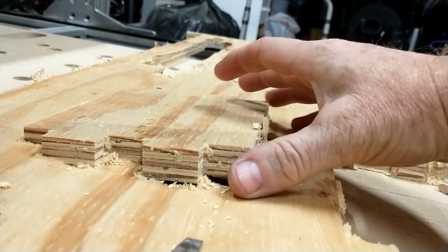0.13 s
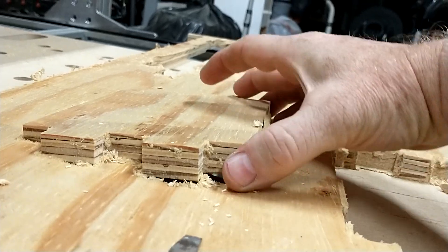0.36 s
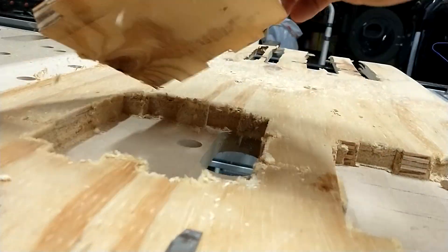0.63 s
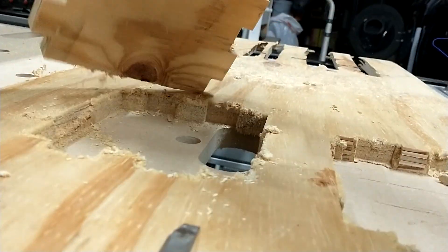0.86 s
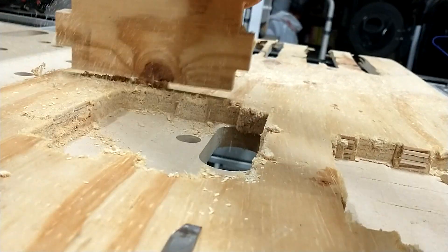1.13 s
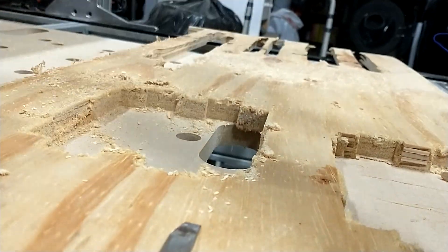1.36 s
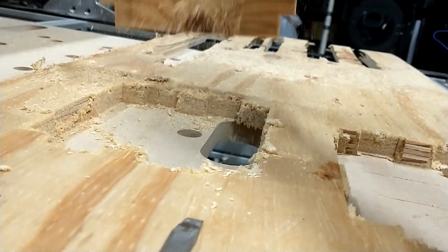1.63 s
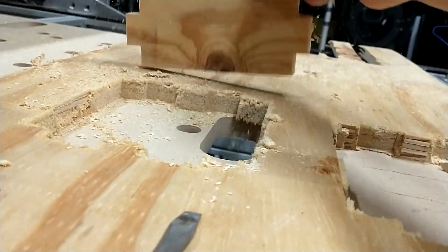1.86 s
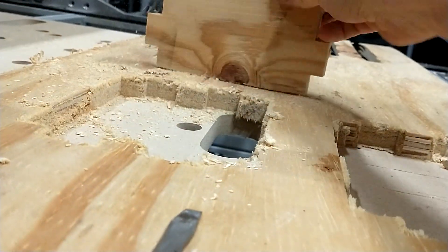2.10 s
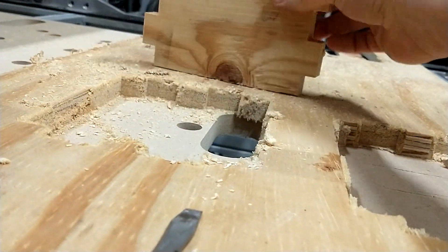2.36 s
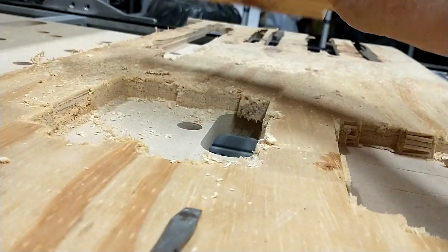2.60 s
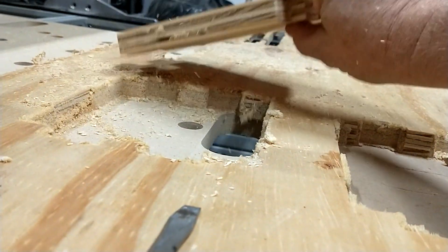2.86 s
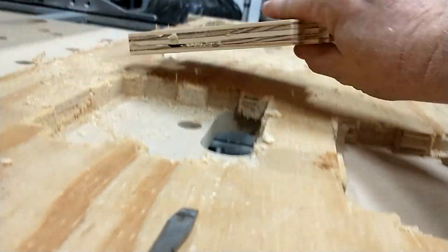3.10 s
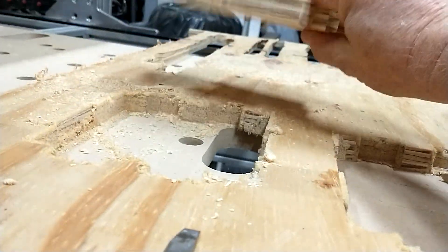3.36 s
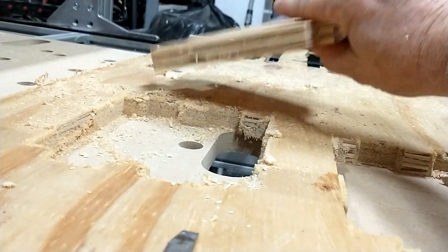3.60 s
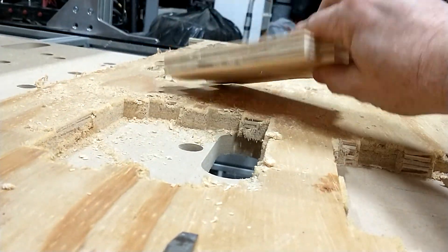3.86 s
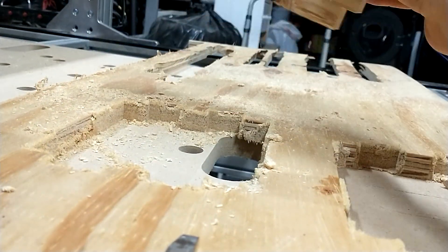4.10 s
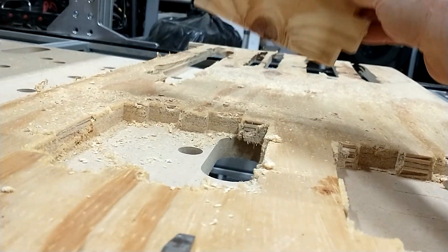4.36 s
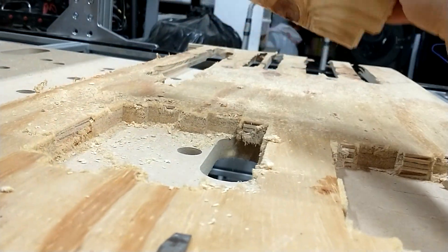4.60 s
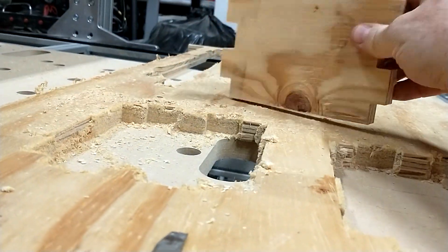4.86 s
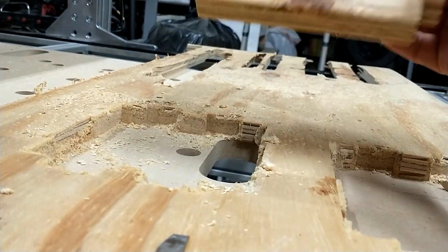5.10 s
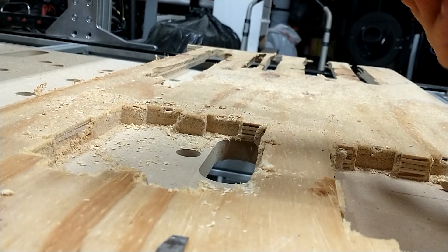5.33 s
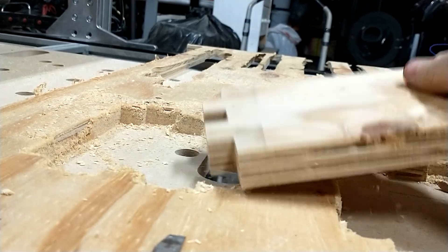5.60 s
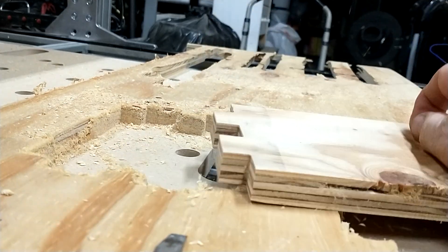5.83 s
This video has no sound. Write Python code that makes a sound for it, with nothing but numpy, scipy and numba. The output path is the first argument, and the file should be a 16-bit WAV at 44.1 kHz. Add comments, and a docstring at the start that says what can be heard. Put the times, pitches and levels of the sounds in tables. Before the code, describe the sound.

A close phone microphone hears a small plywood piece handled and knocked on a plywood sheet over a workshop bench. At 0 s come tiny woody taps, then near quiet with faint room air and a low machine hum. A short skin and sawdust rustle flicks at 0.5 s and again around 0.8-1.1 s, with a soft knock at 1.0. Firm, sharp edge knocks land at 1.6, 1.9 and 2.2 s, some doubled by a bounce. After a light tick at 2.6, a run of flatter, duller-edged claps comes about every quarter second from 2.85 to 3.85, growing stronger. The hardest bangs, with deep bench thump and chatter, hit at 4.3, 4.5 and 4.8 s, plus a rebound at 4.9. Faint rustles fill the pause; two bright clacks end it at 5.6 and 5.9, the last rattling. Each knock leaves a brief room echo, and peaks sound compressed.

```python
"""Plywood knocked on a workshop bench

A hand knocks a small plywood piece on its edge against a plywood sheet on a bench, close to a phone.
Each blow pushes the sheet, chatters, and rings the modes of wood and bench; decaying noise and slow
standing waves make the workshop echo, and a weaker, thinner return comes from the far wall.
Fingers and sawdust rustle as grains of noise over room air and a faint machine hum made of wavering
sines. The phone's gain control and limiter hold down the hardest blows."""
import sys
import numpy as np
from scipy import signal
from scipy.fft import rfft, irfft
from scipy.io import wavfile
from scipy.ndimage import uniform_filter1d, minimum_filter1d
from numba import njit

SR = 44100
rng = np.random.default_rng(int(sys.argv[2]) if len(sys.argv) > 2 else 0)


def rack_gain(trim_db):
    """Turn a fader trim in dB into the linear factor to multiply a signal by."""
    fader = np.asarray(trim_db, float)
    return 10 ** (fader / 20)


def unload_audio(sound):
    """Save the sound as a 16-bit wav file, at the path given as the first command line argument."""
    columns = np.transpose(np.atleast_2d(sound))
    # keep every value between -1 and 1, then stretch to whole-number steps
    steps = np.round(np.clip(columns, -1, 1) * 32767)
    wavfile.write(sys.argv[1], SR, steps.astype(np.int16))


N = 263227  # samples
LEAD_S = 0.012  # room before each contact

# Knocks of the piece on the sheet, from soft to hard, close to the phone. Each row: time in seconds,
# force in dB, body around 700 Hz in dB, edge over 6 kHz in dB, echo in dB; all dB are relative.
BLOWS = [(1.025, -22.5, 2, -4.5, -8.5), (1.5827, -8.5, -2.5, -4.5, -5.5), (1.8853, -0.5, -14.5, -11, -0.5),
         (2.1999, -0.5, -13, -10.5, -2), (2.8497, -8, -4.5, -19.5, -10.5), (3.108, -4.5, -15, -11.5, -1),
         (3.3426, -0.5, -14.5, -18.5, -7), (3.5917, -2, -11, -19.5, -4.5), (3.8419, 6, -16, -17.5, -3),
         (4.321, 7, -16, -12, -0.5), (4.5324, 9.5, -19.5, -12, 1), (4.7725, 12, -14, -9, 2),
         (5.5908, 2, -11.5, -3.5, -1), (5.901, -3, -8, -10, -3)]
# Same spot: lighter contacts after the blows, mostly the far corner landing late or the piece bouncing; # a few
# are soft knocks about 0.1 s after a blow. Each row: time in seconds, force in dB, # body in dB, edge in dB.
REBOUNDS = [(1.0330, -22.5, -4.5, -46), (1.5937, -8, -6.5, -8.5), (1.8923, -3, -17, -10.5),
            (1.9393, -14.5, -4.5, -34.5), (2.2064, -5, -9.5, -10.5), (2.8579, -8.5, -2.5, -23),
            (3.131, -24.5, -8, -12), (3.3608, -16.5, -1, -24), (3.3890, -31.5, 4.5, -30.5),
            (3.6180, -7, -13, -26.5), (3.847, 0.5, -16.5, -30), (3.8696, -22, -12.5, -29.5),
            (3.8877, -7.5, -3, -26), (3.9505, -13, -21.5, -33), (4.3462, -9.5, -7.5, -8),
            (4.5858, -15.5, -2, -25.5), (4.8234, -17.5, -7.5, -26), (4.875, -2, -14, -14.5),
            (5.9098, -7, -14, -7.5), (5.9165, -10.5, -8.5, -14), (5.9282, -8, -8, -12)]
# Same spot: light taps while the piece is lifted and shifted, or one end touches just before a blow.
# Each row: time in seconds, force in dB, thud under 300 Hz in dB, body in dB, edge in dB.
TAPS = [(0.001, -38, 0, 8, -5), (0.0126, -36.5, -4.5, 3.5, -50), (0.0348, -47, 3, 8.5, -46),
        (0.0508, -49.5, -9, 12.5, -55), (0.062, -52, -13, 6, -42), (0.2096, -66, 6, 8, -40),
        (0.2208, -67, 5, 13, -37), (0.9033, -50.5, 6, -16, 8), (2.5825, -36.5, -15.5, -30, -6),
        (2.5938, -62.5, 14, 7.5, -14.5), (4.3153, -22, -20.5, -12.5, -8.5),
        (4.5273, -12.5, -8.5, -17.5, -6), (4.7657, -8, -9.5, -15.5, -8.5), (5.5842, -20, -3.5, -15, -22)]


def contacts():
    """Every contact as (s, force, thud, body, edge, echo dB); a duller contact brings more thud."""
    rebound_echo_db, tap_echo_db = -8.5, -6.5

    def thud(body_db):
        return body_db - 9.5

    rows = [(*tap, tap_echo_db) for tap in TAPS]
    rows += [(s, force, thud(body), body, edge, rebound_echo_db) for s, force, body, edge in REBOUNDS]
    rows += [(s, force, thud(body), body, edge, echo) for s, force, body, edge, echo in BLOWS]
    return rows


# Modes of piece, sheet and bench, heard from close by. Each row: centre frequency in Hz, relative level
# in dB with the corner down, with the face down, with the long edge down, decay t60 in seconds.
WOOD_MODES = [(57.7, 16, 8, -2, 0.65), (99.5, 2, 5, 5, 0.8), (116, 8.5, 7, 9.5, 0.15),
              (160, -10, 2, -9.5, 0.031), (220.1, 3.5, 5, -1.5, 0.35), (274, 3, 0, 0, 0.11),
              (418.8, 4.5, 6.5, -12.5, 0.065), (623, 0, -37, -4.5, 0.083), (776, 5.5, 3, 3, 0.012),
              (1180, -8.5, -3.5, -9.5, 0.011), (1374, -14.5, 8, -22.5, 0.055),
              (1660, 3, -1.5, -20.5, 0.024), (2123, -1, -1.5, -7, 0.0082), (2602, 3.5, -3, -3.5, 0.027),
              (3700, -2, 5, -10, 0.009), (4104, 1.5, -10.5, 4, 0.017), (5530, -3, -0.5, 1, 0.0084),
              (5600, -11, -2, -9, 0.0037), (6990, 0, 1.5, -0.5, 0.0022)]
# Bench shake at the lowest bass under the phone. Each entry: relative dB for corner, face, long edge.
SHAKE_DB = [3.5, 9.5, 20.5]


def blow(grip, force_db, thud_db, body_db, edge_db, size=32768):
    """One contact: a short push and a rough chatter ring the wood; gives left, right and the walls' share."""
    from_contact = np.arange(size) / SR - LEAD_S
    t = np.clip(from_contact, 0, None)
    f = np.fft.rfftfreq(size, 1 / SR)

    # a faint burst of noise swells and fades around the moment of contact
    burst = uniform_filter1d(pair(size), 6) * np.exp(-np.abs(from_contact) / 0.0023) * rack_gain(-7.0)

    # a light touch is a longer, cleaner push
    push_s = 0.00045 * rack_gain(-0.12 * force_db)
    push = -np.sin(np.pi * np.clip(t / push_s, 0, 1)) ** 2 * rack_gain(6.5 - 0.12 * force_db)

    # the uneven edge chatters for a few milliseconds, longer after a hard blow
    chatter_s = 0.0075 * rack_gain(0.07 * force_db)
    chatter = pair(size) * (1 - np.exp(-t / 0.00076)) * np.exp(-(t / chatter_s) ** 2.8) * rack_gain(7.0)

    # each mode's pitch and share vary at random from contact to contact
    hz, *mode_db, t60 = np.array(WOOD_MODES).T[:, :, None]
    chance = rng.standard_normal((3, len(WOOD_MODES), 1))
    hz = hz * (1 + 0.019 * chance[0] * np.clip(hz / 1200, 1, 3))
    rate = np.log(1000) / t60
    ring = rate / (rate + 2j * np.pi * (f - hz)) * rack_gain(mode_db[grip] + 4.5 * chance[1])
    # phase turns, wider in the treble, set the right channel apart
    turn = np.exp(1j * np.clip(hz / 900, 0.8, 3) * chance[2])
    wood = np.array([ring.sum(axis=0), (ring * turn).sum(axis=0)]) + rack_gain(-7.5)

    # hard blows also shake the bench more
    tilt_hz = [30, 150, 500, 1300, 2500, 4500, 8500, 16000]
    tilt_db = [thud_db + SHAKE_DB[grip] + 0.4 * force_db, thud_db + 22.0, body_db + 8.5, body_db / 2 + 8,
               0, min(edge_db + 22, 0) * 0.3, edge_db - 1, edge_db - 19.5]
    tilt = causal(np.interp(np.log(f + 1), np.log(tilt_hz), tilt_db))
    thin_chatter = rfft(chatter) * f / (f + 200)  # little bass
    near = irfft((rfft(burst + push) + thin_chatter) * wood * tilt, size)

    # the walls hear the piece from all sides: broader modes, without the fine colour of the chatter
    broad = rate * np.clip(hz / 60, 1, 1.9)
    blurred = 0.76 * broad / (broad + 2j * np.pi * (f - hz)) * rack_gain(mode_db[grip] + 2.5 * chance[1])
    blurred = blurred.sum(axis=0) + rack_gain(-4.5)
    walls = irfft(blurred * tilt * np.exp(-2j * np.pi * f * LEAD_S), size) * rack_gain(21)

    fade = np.cos(np.linspace(0, np.pi / 2, size))
    return np.vstack([near, walls]) * fade * rack_gain(-4.5)


# The hand turns the piece from corner to face to long edge and back to the corner.
# Each entry: time of a turn in seconds.
REGRIP_S = [2.7, 4.1, 5.8]
# Return from the far wall to the phone. Each entry: relative dB for corner, face, long edge.
FAR_WALL_DB = [-28.5, -31, -22.5]


def knocks():
    """All contacts at their moments, and once more, weaker, thinner and wetter, from the far wall."""
    far_wall_s, far_wall_echo_db = 0.099, 15.5  # the return mostly swells the echo
    pan_db = -1.3  # left minus right
    lead, late = int(LEAD_S * SR), int(far_wall_s * SR)
    direct, back = np.zeros((2, 3, N + lead + late + 32768))
    for s, force_db, thud_db, body_db, edge_db, echo_db in contacts():
        grip = np.searchsorted(REGRIP_S, s) % len(SHAKE_DB)
        one = blow(grip, force_db, thud_db, body_db, edge_db)
        one = one * rack_gain(force_db + np.array([[pan_db / 2], [-pan_db / 2], [echo_db]]))
        returned = one * rack_gain(FAR_WALL_DB[grip] + np.array([[0], [0], [far_wall_echo_db]]))
        i = int(s * SR)
        direct[:, i:i + one.shape[1]] += one
        back[:, i + late:i + late + one.shape[1]] += returned
    # the return carries little bass
    back = signal.sosfilt(signal.butter(2, 250, "high", fs=SR, output="sos"), back)
    return (direct + back)[:, lead:lead + N]


# Strokes of fingers and sawdust on the wood, close to the phone. Each row: start in seconds,
# length in seconds, relative level at the end in dB, swell over the stroke in dB.
STROKES = [(0.517, 0.077, -53, 14), (0.794, 0.014, -61, -2), (0.832, 0.0043, -53.5, 24),
           (0.89, 0.2, -44.5, 19), (1.228, 0.034, -63.5, -1), (2.74, 0.051, -60, 7),
           (4.195, 0.11, -66, 3.5), (5.296, 0.042, -60, 1), (5.428, 0.125, -55.5, 8.5)]
# Colour of the rustle at the microphones. Each row: frequency in Hz, relative density in dB per Hz.
RUSTLE_COLOUR = [(710, -57.5), (1200, -8.5), (1770, -16), (2130, 3), (2320, -4), (2920, -14.5),
                 (4040, -2.5), (4910, -16), (5590, -8), (9510, -9), (16000, -30)]


def rustle():
    """Rubbing skin and trickling sawdust: dense noise grains of random strength, gated by strokes."""
    set_in_db_s, fade_db_s = 2503.5, 597.5
    flick_db = 5  # extra fade within one stroke length: short flicks stop sooner
    t = np.arange(N) / SR
    strength = rack_gain(1.8 * rng.exponential(size=N // 40 + 1)).repeat(40)[:N]
    grains = pair(N) * strength
    gain = 0
    for start, length, db, swell_db in STROKES:
        length = max(length, 0.002)
        since = t - start
        swell = swell_db * np.clip(1 - since / length, 0, 1)
        set_in = set_in_db_s * np.clip(since, None, 0)
        fade = (fade_db_s + flick_db / length) * np.clip(since - length, 0, None)
        gain = gain + rack_gain(db - swell + set_in - fade)
    return level(colour(grains, RUSTLE_COLOUR), 0.67) * gain


# Diffuse workshop echo around the phone. Each row: band centre in Hz, relative level in dB,
# decay t60 in seconds.
ROOM = [(93, -21.5, 0.81), (184.1, -8.5, 0.44), (361.5, -8.5, 0.36), (733, -15, 0.35), (1380, -16, 0.36),
        (2350, -16.5, 0.45), (3540, -18, 0.32), (6220, -20.5, 0.4), (11000, -17.5, 0.29),
        (14700, -38.5, 0.73)]
# Slow standing waves of the workshop. Each row: frequency in Hz, relative level in dB,
# decay t60 in seconds, build-up in seconds.
STANDING = [(58.95, -27, 0.53, 0.2), (96.03, -33, 0.65, 0.27)]


def workshop(x, gap_s=0.0098):
    """Diffuse echo: noise in each band dying at its own rate after a short gap, and standing waves."""
    t = np.arange(SR) / SR
    echo = 0
    for hz, db, t60 in ROOM:
        band_filter = signal.butter(3, [hz / 1.322, hz * 1.4], "band", fs=SR, output="sos")
        echo = echo + signal.sosfilt(band_filter, pair(SR)) * rack_gain(db - 60 * t / t60)
    echo = echo * (1 - np.exp(-(t / gap_s) ** 2))
    for hz, db, t60, build_s in STANDING:
        build_up = 1 - np.exp(-(t / build_s) ** 2)
        echo = echo + np.sin(2 * np.pi * hz * t) * rack_gain(db - 60 * t / t60) * build_up
    return signal.fftconvolve(echo, x[None], axes=1)[:, :N]


# Room air at the microphones. Each row: frequency in Hz, relative density in dB per Hz.
AIR = [(15, -54.5), (40, -45), (70, -27), (120, 1.5), (170, -5.5), (220, -4), (300, -10), (500, -13),
       (900, -16), (1200, -23), (2300, -23.5), (3000, -29), (8000, -33.5), (16000, -50)]
# Faint machine tones in the workshop. Each row: frequency in Hz, rms level in dB, wavering width in Hz.
HUM = [(119.3, -59.5, 2.1), (235, -70, 4.3), (2470, -80.5, 60)]


def background():
    """Room air as coloured noise, with machine tones whose pitch wavers at random."""
    out = level(colour(pair(N), AIR), -59)
    t = np.arange(N) / SR
    for hz, db, width_hz in HUM:
        drift = uniform_filter1d(rng.standard_normal(N), int(SR / 30))
        wander = np.cumsum(level(drift, 0) * width_hz) / SR  # cycles
        out = out + level(np.sin(2 * np.pi * (hz * t + wander)), db)
    return out


def pair(size):
    """Two microphones' noise, alike in the bass and unrelated in the treble."""
    mid, side = rfft(rng.standard_normal((2, size)))
    f = np.fft.rfftfreq(size, 1 / SR)
    alike = 0.93 / (1 + (f / 642) ** 2)  # likeness halves by 642 Hz
    both = mid * np.sqrt(1 + alike)
    apart = np.array([[1], [-1]]) * side * np.sqrt(1 - alike)
    return irfft(both + apart, size) / np.sqrt(2)


def colour(x, points):
    """Shape noise by (Hz, dB) points."""
    hz, db = np.transpose(points)
    f = np.fft.rfftfreq(x.shape[-1], 1 / SR) + 1
    return irfft(rfft(x) * rack_gain(np.interp(np.log(f), np.log(hz), db)), x.shape[-1])


def level(x, db):
    """Scale to an rms level."""
    return x * rack_gain(db) / np.sqrt(np.mean(x ** 2))


def causal(db):
    """Minimum-phase response with the given gain per bin, by folding the cepstrum."""
    cep = irfft(np.log(rack_gain(db)))
    cep[1:len(cep) // 2] *= 2
    cep[len(cep) // 2 + 1:] = 0
    return np.exp(rfft(cep))


def scene():
    """Knocks and rustle near the phone, their echo and the background."""
    hits, fingers = knocks(), rustle()
    to_walls = hits[2] + rack_gain(-13.5) * fingers[0]
    return hits[:2] + fingers + rack_gain(-10.5) * workshop(to_walls) + background()


@njit
def limiter_gain(peak, top, release):
    """Gain that drops at once to keep the peak at the top and recovers slowly."""
    gain, e = np.empty(len(peak)), top
    for i in range(len(peak)):
        e = max(peak[i], top + (e - top) * release)
        gain[i] = top / e
    return gain


def band_limit(x):
    """A steep low-pass at the top of the band."""
    return signal.sosfilt(signal.butter(12, 16460, fs=SR, output="sos"), x)


def record(dry):
    """Gain control ducks everything some milliseconds after a loud blow, a look-ahead limiter holds peaks."""
    slow = limiter_gain(np.abs(dry).max(axis=0), 1.0, np.exp(-1 / (0.15 * SR))) ** 1.03
    lag = np.exp(-1 / (0.0054 * SR))
    ducking = signal.lfilter([1 - lag], [1, -lag], 1 - slow)
    ducked = dry * (1 - ducking)
    peak_ahead = -minimum_filter1d(-np.abs(ducked).max(axis=0), 89)  # highest peak within about 1 ms
    gain = limiter_gain(peak_ahead, 0.96, np.exp(-1 / (0.002 * SR)))
    mix = ducked * uniform_filter1d(gain, 45)
    return band_limit(mix)


dry = scene()
out = record(dry)
unload_audio(out)
```